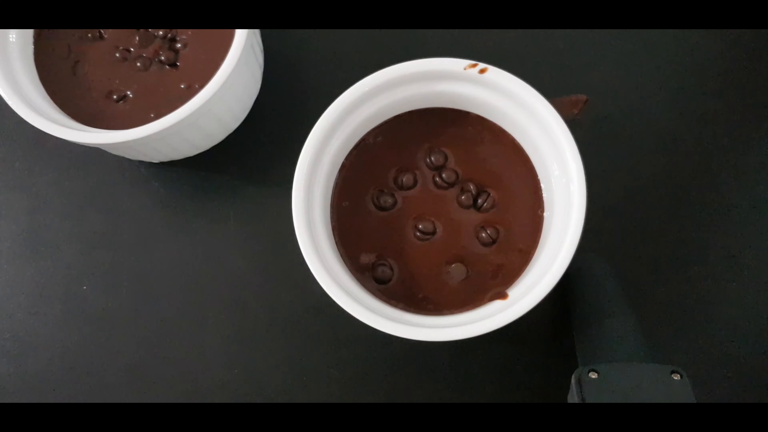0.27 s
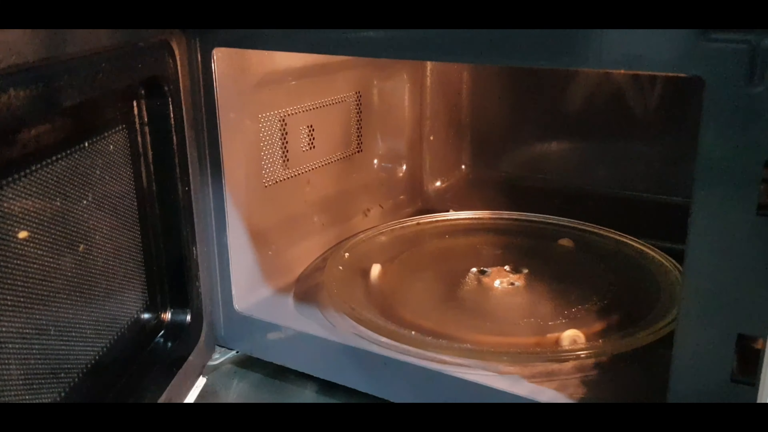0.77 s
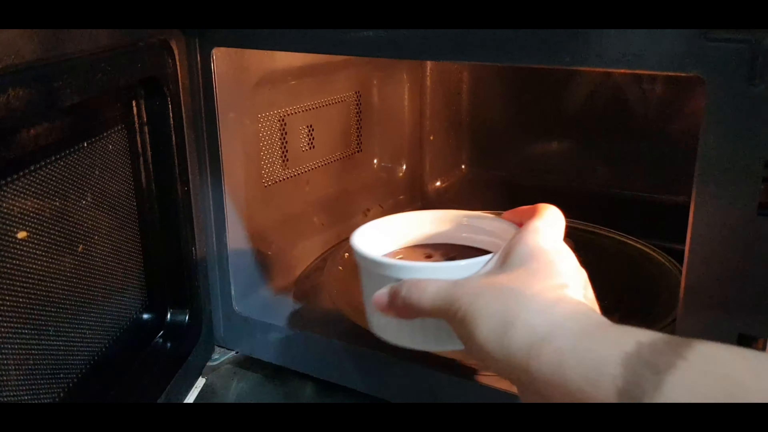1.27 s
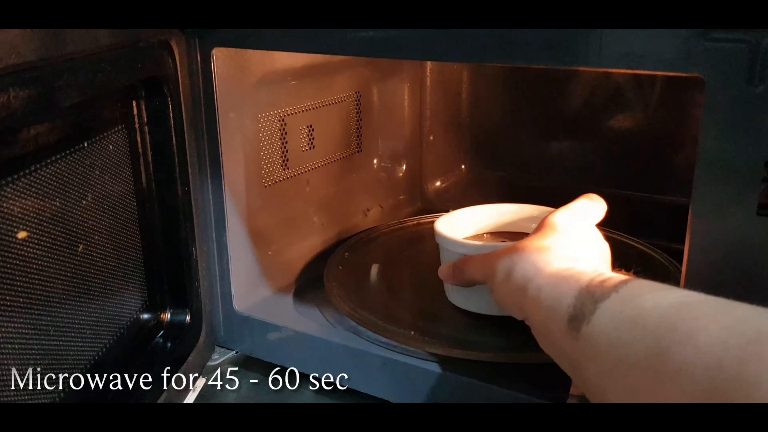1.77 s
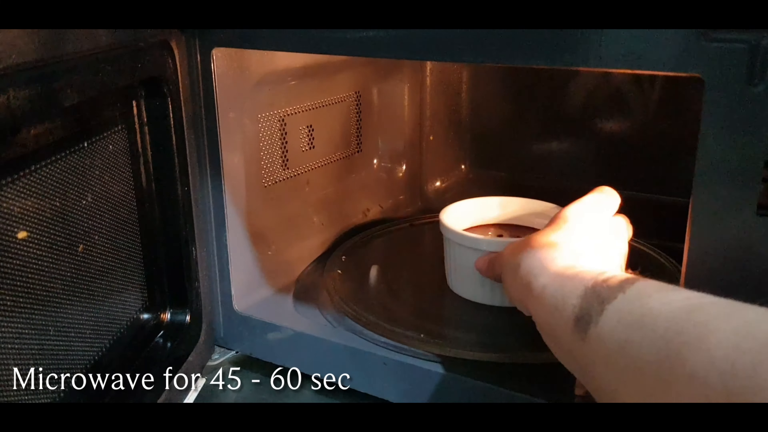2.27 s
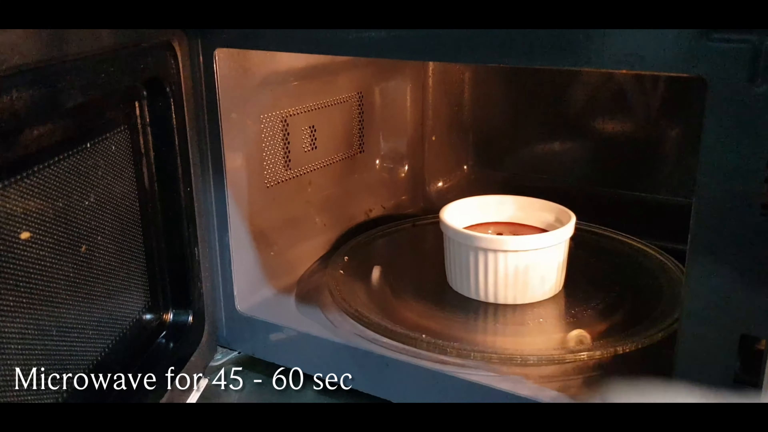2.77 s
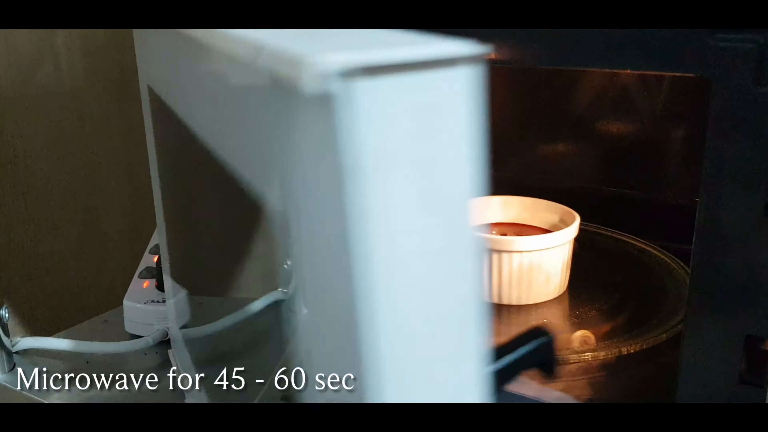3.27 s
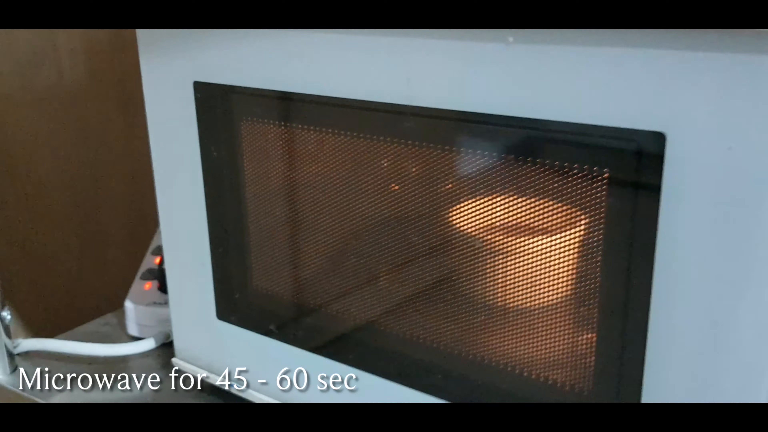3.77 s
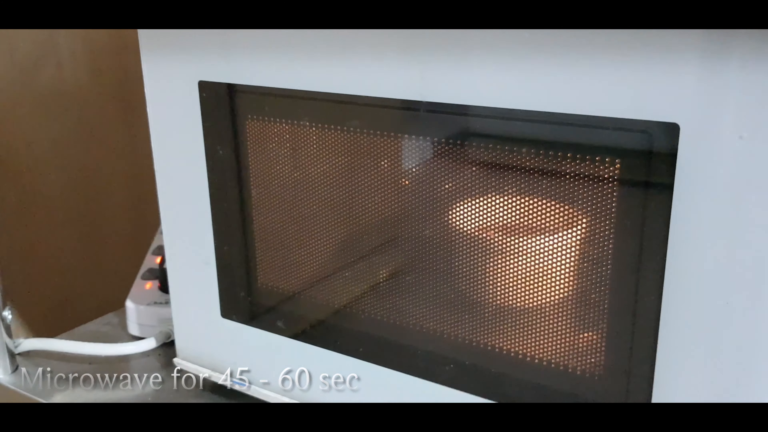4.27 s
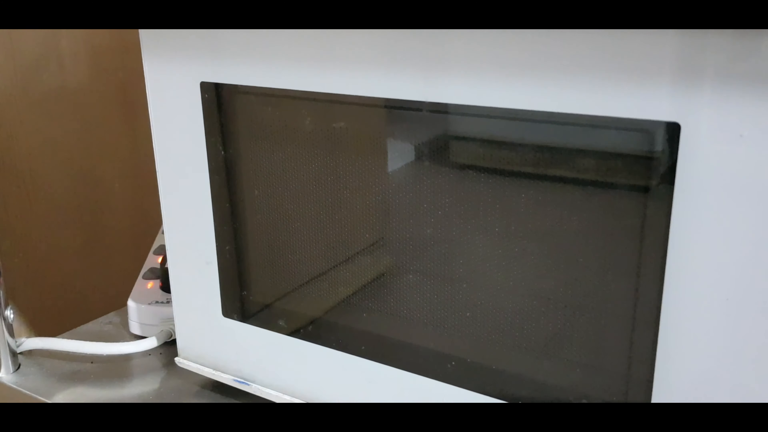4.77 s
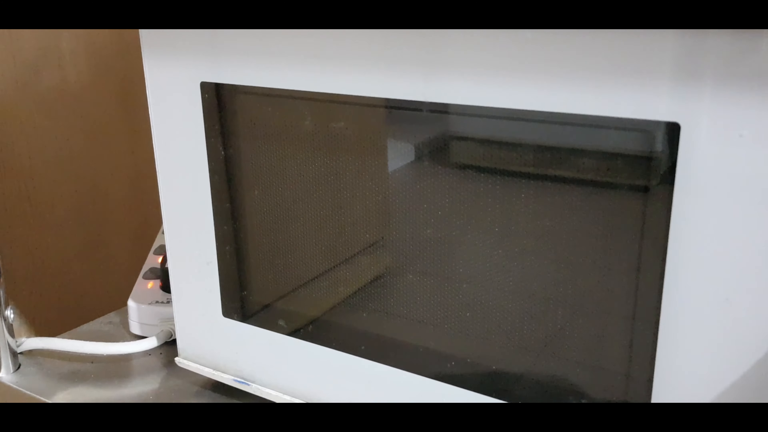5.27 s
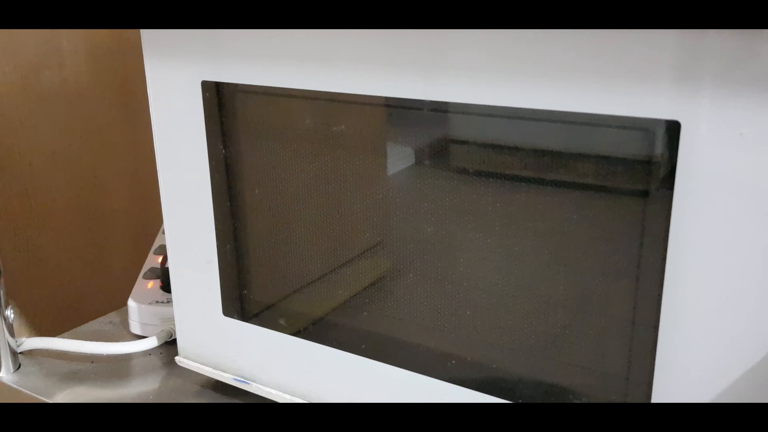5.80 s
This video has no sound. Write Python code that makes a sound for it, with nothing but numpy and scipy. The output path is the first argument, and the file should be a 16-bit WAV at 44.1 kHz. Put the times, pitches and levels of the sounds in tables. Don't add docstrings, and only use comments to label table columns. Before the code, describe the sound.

Quiet kitchen rumble and cloth movement lead to a sharp ceramic-on-glass clink as a dish is set inside a microwave oven. It wobbles, tips flat with a second knock and slides briefly with gritty scraping. The hinge squeaks faintly; a rattly latch knock comes first, then a much louder slam whose low thump and metallic rattle fade into the room. Heard close to the oven in stereo, with short hard-wall reflections.

```python
import sys
import numpy as np
from scipy import signal
from scipy.fft import rfft, irfft, next_fast_len
from scipy.io import wavfile
from scipy.ndimage import uniform_filter1d

SR = 44100
rng = np.random.default_rng(int(sys.argv[2]) if len(sys.argv) > 2 else 0)


def pcm_store(signal):
    levels = np.round(np.clip(np.atleast_2d(signal), -1, 1) * 32767)
    wavfile.write(sys.argv[1], SR, levels.astype(np.int16).T)


def invert_db(x):
    u = np.asarray(x, float) / 20
    return 10 ** u


N = 266231

PORT_LAG, FRONT_LAG = 16, 1

# t/s, level/dB
SET_DOWN_HITS = [
    (1.7415, 0),
    (1.743, -13.5),
    (1.753, -31),
    (1.805, -31),
    (1.868, -32),
]
# t/s, level/dB
TIP_FLAT_HITS = [
    (2.0345, -18),
    (2.0374, -13.5),
    (2.0401, -0.5),
    (2.055, -17),
    (2.1706, -30),
]


def rms_one(x):
    return x / np.sqrt(np.mean(x ** 2) + 1e-20)


def at_hz(points, hz):
    table_hz, values = np.transpose(points)
    return np.interp(np.log(hz + 1), np.log(table_hz), values)


def stereo_noise(spectrum, size=N, lag=PORT_LAG):
    # f/Hz, correlation
    likeness = [(60, 0.96), (290, 1), (640, 0.36), (1400, 0.229), (5000, 0.069), (15000, 0.053)]
    padded = 2 * next_fast_len(size // 2 + 1)
    hz = np.arange(padded // 2 + 1) * SR / padded
    mid, side = rfft(rng.standard_normal((2, padded)))
    alike = np.clip(at_hz(likeness, hz), 0, 1)
    left, right = np.sqrt(1 + alike) * mid + np.sqrt(1 - alike) * side * [[1], [-1]]
    right = right * np.exp(-2j * np.pi * hz * lag / SR)
    coloured = invert_db(at_hz(spectrum, hz)) * np.array([left, right])
    return rms_one(irfft(coloured, padded)[:, :size])


def flicker(rate):
    knots = rng.standard_normal(400)
    return np.interp(np.arange(N) / SR * rate, np.arange(400), knots)


def envelope(s, rise_s, hold_s, fall_s):
    corners = np.cumsum([0, rise_s, hold_s, fall_s])
    return np.interp(np.arange(N) / SR - s, corners, [0, 1, 1, 0])


def swells(rows):
    t = np.arange(N) / SR
    return sum(invert_db(level_db) ** 2 * np.exp(-((t - s) / spread) ** 2) for s, spread, level_db in rows)


def ring(drive, hz, t60):
    r, w = invert_db(-60 / (t60 * SR)), 2 * np.pi * hz / SR
    return signal.lfilter([0, np.sin(w)], [1, -2 * r * np.cos(w), r * r], drive + 1e-18)


def soft_blow(drive, hz, swell_s):
    return ring(drive, hz, swell_s) * 2 * np.log(1000) / (swell_s * SR)


def clicks(times, levels_db):
    out = np.zeros(N)
    out[np.round(np.asarray(times) * SR).astype(int)] = invert_db(levels_db)
    return out


def bursts(rows, colour, rise_s, grain_db=0.):
    t = np.arange(SR // 2) / SR
    first = round(min(rows)[0] * SR)
    size = min(N, round(max(rows)[0] * SR) + len(t)) - first
    loudness, out = np.zeros(N + len(t)), np.zeros((2, N))
    for s, level_db, t60, *_ in rows:
        loudness[round(s * SR):][:len(t)] += invert_db(level_db - 60 * t / t60) * np.minimum(t / rise_s, 1)
    knots = size // 128 + 2
    grain = np.interp(np.arange(size) / 128, np.arange(knots), rng.standard_normal(knots))
    noise = stereo_noise(colour, size=size, lag=FRONT_LAG)
    out[:, first:first + size] = loudness[first:first + size] * invert_db(grain_db * grain) * noise
    return out


def to_ports(x, pan_db, lag=FRONT_LAG):
    return np.array([x * invert_db(pan_db / 2), np.roll(x, lag) * invert_db(-pan_db / 2)])


def background():
    # f/Hz, level/dB per Hz
    rumble_colour = [(12, -43.5), (20, -22), (33, 1), (54, 3.5), (86, 3), (134, -8), (160, -11), (210, -30),
                     (350, -120)]
    tone_colour = [(94, -35.5), (160, -2.5), (270, -6.5), (345, -7), (451, -12), (581, -10.5), (730, -15.5),
                   (980, -12), (1200, -20), (1560, -38.5), (2640, -120)]
    upper_colour = [(710, -32.5), (1200, 1), (1850, -1), (2270, -5), (2450, -5.5), (3590, -12.5),
                    (4170, -11.5), (6650, -19), (15000, -31.5), (16000, -31.5)]
    cloth_colour = [(1470, -31), (2500, -7.5), (3280, -4), (3550, -3.5), (5920, -5.5), (9730, -7),
                    (11400, -5.5), (15200, -8.5), (16000, -11)]
    hiss_colour = [(1500, -30), (2000, -5), (2400, 1), (2900, -10), (3600, -25)]
    # t/s, level/dB
    kitchen = [(0, -0.5), (.63, 2.5), (.69, 0.5), (.71, -5.5), (.99, 1.5), (1.2, -2.5), (1.8, -2.5),
               (2.3, -7), (2.9, -5.5), (3.75, -7), (4.3, -5), (4.54, 3), (5.0, -0.5), (5.25, 5.5),
               (5.45, -5.5), (6.04, -8)]
    # t/s, spread/s, level/dB
    shifts = [
        (.55, 0.1, -48),
        (.95, 0.39, -45),
        (1.6, 0.16, -40.5),
        (3.05, 0.34, -45),
        (4.1, 0.14, -42.5),
        (4.45, 0.091, -44),
        (4.8, 0.092, -39),
    ]
    # t/s, spread/s, level/dB
    brushes = [
        (.1, .15, -83),
        (.42, .12, -81),
        (.64, .07, -68),
        (.97, 0.13, -54),
        (1.3, 0.17, -60),
        (1.65, 0.13, -68.5),
        (3.15, 0.24, -69),
        (3.275, 0.049, -58.5),
        (4.2, 0.17, -69),
        (4.54, 0.066, -68),
    ]
    kitchen_db = np.interp(np.arange(N) / SR, *np.transpose(kitchen))
    rumble = np.sqrt(invert_db(-46.5 + 0.71 * kitchen_db) ** 2 + swells(shifts))
    out = rumble * invert_db(2.536 * flicker(9.)) * stereo_noise(rumble_colour)
    out += invert_db(-46 + 0.8 * kitchen_db + 0.98 * flicker(15.0)) * stereo_noise(tone_colour)
    swing_db = 4 * envelope(3, 0.24, 1, 0.24)
    out += invert_db(-55.5 + kitchen_db + swing_db + .5 * flicker(12.0)) * stereo_noise(upper_colour)
    hiss = invert_db(-62) * envelope(-1, .5, 0.5 + .68, .02)[:SR]
    out[:, :SR] += hiss * stereo_noise(hiss_colour, size=SR)
    cloth = np.sqrt(invert_db(-78.5) ** 2 + swells(brushes))
    return out + cloth * invert_db(0.617 * flicker(22.0)) * stereo_noise(cloth_colour)


def ticks():
    # t/s, level/dB, t60/s
    taps = [(.3, -66, 0.06), (.4774, -44, .015), (.5063, -50, 0.022), (2.417, -53, .03), (2.9353, -57, .03),
            (4.69, -49.5, .02), (4.699, -53.5, 0.022), (4.7028, -30.5, 0.018), (4.7105, -42, 0.055),
            (4.7657, -45, 0.022), (5.1039, -50, 0.021), (5.63, -58, 0.034)]
    # f/Hz, level/dB per Hz
    colour = [(240, -22), (400, -2), (2050, -19.5), (3210, -15.5), (4050, -18), (5030, -16.5), (6850, -19),
              (11900, -21), (16000, -28.5)]
    return bursts(taps, colour, 0.0014)


def pings():
    # t/s, f/Hz, level/dB, t60/s
    notes_struck = [(.31, 8720, -59, 0.067), (1.868, 1840, -45, 0.13), (1.922, 970, -38, 0.055),
                    (1.959, 1015, -48, .06), (1.961, 1800, -51.5, 0.18), (1.983, 1060, -48, .06),
                    (2.004, 1000, -42, 0.062), (2.166, 1030, -46, 0.044), (2.177, 1080, -39.5, 0.05),
                    (2.187, 1130, -48, 0.035), (2.932, 6574, -63.5, .04), (2.935, 9150, -61, 0.038),
                    (3.511, 4520, -60, .05), (4.478, 1150, -18, .018), (4.4843, 1900, -16, 0.0077),
                    (4.4886, 1500, -19, .015), (4.493, 2530, -25.5, 0.018), (4.497, 2200, -19, 0.013),
                    (4.5, 1180, -34, 0.0095), (4.506, 2270, -27, .02), (4.5127, 2550, -26, 0.02),
                    (4.523, 2800, -35.5, 0.018), (4.531, 2300, -32, 0.022), (4.536, 2666, -45, .03),
                    (4.548, 2520, -32.5, .03), (4.563, 2520, -40.5, .03), (4.578, 2360, -42, .03),
                    (5.134, 5920, -25.5, 0.018), (4.489, 6140, -36, 0.046), (4.686, 8820, -58, .03),
                    (5.15, 12400, -43.5, 0.05)]
    out = np.zeros(N)
    for s, hz, level_db, t60 in notes_struck:
        start, touch = round(s * SR), np.zeros(8000)
        touch[0] = invert_db(level_db)
        out[start:start + len(touch)] += ring(soft_blow(touch, hz, .005), hz, t60)
    return to_ports(out, 0.)


def rocking_db():
    # t/s, length/s, depth/dB
    chokes = [
        (1.75, 0.011, 28),
        (1.806, 0.066, 16),
        (1.938, 0.023, 14),
    ]
    t = np.arange(N) / SR
    opening_db = 11.5 * (t - SET_DOWN_HITS[0][0])
    free_db = np.where(t < TIP_FLAT_HITS[0][0], opening_db, -5)
    for s, length, depth_db in chokes:
        grip_s = min(0.015, length)
        free_db = free_db - depth_db * envelope(s, grip_s, length - grip_s, 0.0084)
    return uniform_filter1d(free_db, size=200)


def dish():
    # f/Hz, t60/s, set-down/dB, tip-flat/dB, slide/dB, left over right/dB
    plate_and_dish_modes = [(266.5, 0.24, -34, -33.5, -9, 1), (503, 0.56, -44.5, -38.5, -12, -1),
                            (518.5, .45, -40.5, -39.5, -9, 1), (605, 0.14, -34.5, -28, -7, 8),
                            (623.6, .22, -42, -36, -4, 2), (758, 0.097, -27.5, -34, -12, 18.5),
                            (816, 0.18, -22.5, -40, -5, -5.5), (837, .24, -32, -39, -13, -2),
                            (901, .24, -33.5, -48, -18, 2), (938, 0.39, -31, -43, -17, -2.5),
                            (1031, 0.033, -15, -18, 5, 15.5), (1080, 0.073, -22.5, -40, 0, 6),
                            (1141, 0.09, -38, -36, -9, -3), (1245, 0.06, -34.5, -26, -5, 2),
                            (1290, 0.22, -41, -34.5, -18, 0), (1450, 0.0496, -26, -47, -15, -2),
                            (1390, 0.13, -26.5, -40, -10, 10.5), (1710, 0.23, -21, -38, -9, -14.5),
                            (1748, 0.26, -9.5, -39, -7, -5), (1760, 0.63, -35, -55, -24, -1),
                            (1797, 0.05, -10.5, -30, -4, -11), (1840, .085, -31, -32.5, -1.5, -0.5),
                            (1950, 0.078, -20.5, -44, -13, -1), (2137, 0.17, -40, -36, -16, -9),
                            (2356, 0.036, -19.5, -43, -27, 12), (2640, 0.029, -34, -56, -29, 0),
                            (2990, .15, -30, -48, -24, -3), (2986, 0.26, -21, -49, -22, -6),
                  (3040, 0.6, -46, -65, -32, -1), (3100, 0.21, -40, -55, -13, -2),
                  (3200, 0.083, -29, -52, -24, 7), (3213, 0.17, -23.5, -48, -19, 10),
                  (3240, 0.23, -34.5, -50, -30, 4), (3330, 0.029, -33, -33, -18, -2.5),
                  (3280, 0.294, -50, -52, -22, 0), (3340, 0.14, -46, -52, -12, 2.5),
                  (4030, 0.0521, -37, -54, -20, 4.5), (4510, 0.33, -48, -51.5, -20.5, -1.5),
                  (4954, 0.13, -28.5, -58, -32, -4), (5010, 0.25, -41, -75, -46, 0),
                  (6140, 0.109, -56.5, -58, -24.5, 1), (6990, 0.13, -44, -54, -25, 1.5),
                  (7360, .08, -57.5, -50.5, -26, 7.5), (8760, .12, -69, -71, -47, -6.5),
                  (9690, .1, -59.5, -65, -26, 9), (11440, 0.112, -55.5, -60, -34, 0.5),
                  (12480, .09, -52, -50, -33, 9), (12580, .06, -56, -44.5, -29, 10)]
    # t/s, level/dB
    catches = [(2.3865, -26.5), (2.4165, -18.5), (2.421, -17.5), (2.444, -22.5), (2.473, -20), (2.495, -14),
               (2.515, -16.5), (2.531, -15.5), (2.547, -16), (2.57, -25), (2.6, -35), (2.612, -29),
               (2.6333, -19), (2.66, -29)]
    # t/s, level/dB, t60/s
    clatter = [
        (1.7415, -31, 0.05),
        (1.75, -28, 0.35),
        (2.035, -26.5, 0.056),
        (2.039, -29.5, 0.037),
        (2.05, -34, 0.29),
        (2.172, -48.5, 0.063),
    ]
    # t/s, level/dB, t60/s
    chatter = [
        (1.756, -55.5, 0.23),
        (2.076, -59, 0.16),
        (2.418, -72, .5),
        (2.5, -74, 0.37),
    ]
    # f/Hz, level/dB per Hz
    clatter_colour = [(120, -43.5), (200, -12.5), (281, -14.5), (437, -22.5), (598, -1), (1790, -11),
                      (2590, -23), (4580, -27), (5130, -37), (5430, -66), (6000, -36), (7800, -61),
                      (13200, -120)]
    chatter_colour = [(6000, -40), (8200, -12), (9500, -2), (10800, -9), (12400, 3), (13200, -30)]
    scrape_colour = [(180, -36), (300, -3), (459, -3), (497, -1), (1060, -1), (1520, -16), (1810, -11),
                     (2520, -46), (3100, -16), (4050, -37), (13000, -53)]

    span = slice(round(1.7 * SR), round(3.1 * SR))
    set_down = clicks(*np.transpose(SET_DOWN_HITS))[span]
    tip_flat = clicks(*np.transpose(TIP_FLAT_HITS))[span]
    stroke = invert_db(-46) * envelope(2.395, 0.1, 0.067, 0.15)
    struck = rng.random(N) < 2500 / SR
    grit = struck * invert_db(2.5 * rng.exponential(1, N)) * rng.choice([-1, 1], N)
    slide = (invert_db(-30.0) * stroke * grit)[span]
    catch_s, catch_db = np.transpose(catches)
    uneven_db = 3. * rng.standard_normal((len(catches), 60))
    apart = rng.uniform(-1, 1, 60)
    rocking = invert_db(rocking_db()[span])
    wobble = invert_db(2.5 * flicker(60.))

    out = invert_db(-2.0 + 2.1 * flicker(60.)) * stroke * stereo_noise(scrape_colour, lag=FRONT_LAG)
    for k, (hz, t60, set_db, tip_db, slide_db, pan_db) in enumerate(plate_and_dish_modes):
        caught = clicks(catch_s, catch_db - 34.5 + uneven_db[:, k])[span]
        drive = invert_db(set_db) * set_down + invert_db(tip_db) * tip_flat + invert_db(slide_db) * (slide + caught)
        drive = soft_blow(drive, hz, .0036)
        mode = (-1) ** k * ring(drive, hz, t60)
        if hz > 5500:
            mode += 0.64 * ring(drive, hz * 1.011, t60 * .7)
            mode -= 0.47 * ring(drive, hz * 0.53, t60 * 0.49)
        if 1700 < hz < 1795:
            mode *= rocking
        lag_cycles = .16 * apart[k] - .1
        lag = round(lag_cycles * min(SR / hz, 25))
        out[:, span] += to_ports(mode * np.roll(wobble, 7919 * k)[span], pan_db, lag)
    out += bursts(clatter, clatter_colour, 0.0022)
    return out + bursts(chatter, chatter_colour, .006)


def hinge():
    # t/s, length/s, f/Hz, level/dB
    squeaks = [
        (3.343, 0.11, 3760, -66),
        (3.47, 0.07, 3765, -67.5),
    ]
    waver_hz, grip_db, out = 15 * flicker(60.), 2.5 * flicker(55.), 0
    for s, length, hz, level_db in squeaks:
        swell = envelope(s, 0.18 * length, 0.63 * length, 0.3 * length)
        whistle = np.sin(2 * np.pi * np.cumsum(hz + waver_hz) / SR)
        out = out + invert_db(level_db + grip_db) * swell * whistle
    return to_ports(out, 0.)


def door():
    # t/s, rattle/dB, rattle t60/s, thump/dB
    knock_hits = [
        (4.474, -29.5, 0.044, -57),
        (4.477, -23, 0.03, -30.5),
        (4.4846, -19.5, 0.053, -27),
        (4.494, -22, 0.033, -32),
        (4.501, -28.5, 0.26, -36),
    ]
    # t/s, rattle/dB, rattle t60/s, thump/dB
    slam_hits = [
        (5.119, -37.5, 0.065, -50),
        (5.1245, -16.5, 0.02, -13),
        (5.127, -11, 0.045, -16),
        (5.133, -18, 0.068, -15),
        (5.14, -19.5, 0.16, -21.5),
        (5.156, -32, 0.45, -29.5),
        (5.251, -42, 0.056, -63),
    ]
    # t/s, level/dB, t60/s
    latch = [
        (4.477, -32.5, 0.039),
        (5.1265, -19, 0.04),
        (5.131, -21.5, 0.044),
        (5.255, -49, .04),
    ]
    # f/Hz, level/dB per Hz
    knock_colour = [(180, -17.5), (300, -1.5), (420, -9), (634, -12.5), (1080, -9.5), (1400, -9.5),
                    (1750, -6.5), (2200, -9), (2700, -10), (3100, -14), (4670, -23.5), (6200, -25),
                    (12500, -36.5), (16000, -41)]
    slam_colour = [(210, -32.5), (350, -4), (520, -7), (742, -12), (1060, -6), (1280, -16), (1430, -9.5),
                   (2840, -16.5), (3080, -17), (3340, -15.5), (12200, -31), (16000, -24.5)]
    latch_colour = [(1760, -42), (3000, -17), (3260, -7.5), (3730, -11), (5960, -0.5), (7780, -13.5),
                    (12300, -5.5), (16000, -24)]
    # f/Hz, t60/s, knock/dB, slam/dB
    casing = [(475, 0.9, -25, -31), (542, 0.71, -28.5, -26.5), (580, 0.43, -25, -27.5),
              (630, .25, -27, -23), (682, 0.19, -8, -23.5), (893, 0.36, -6, -15.5), (1036, .3, -31, -24.5),
              (1070, 0.2, -13.5, -41), (1444, .2, -25, -25.5)]
    # f/Hz, t60/s, level/dB
    panel = [(79, 0.35, -8), (105.4, 0.45, -13), (144, 0.18, -14), (164, 0.3, -13.5), (207.3, 1, -3),
             (221.5, 0.33, -1), (225, 0.11, 2.5), (276, 0.23, -20), (321.4, 0.19, -11.5),
             (359, 0.65, -16.5), (404, 0.4, -17.5)]
    first, thump = round(4.4 * SR), np.zeros(N)
    knock_s, _, _, knock_thump_db = np.transpose(knock_hits)
    slam_s, _, _, slam_thump_db = np.transpose(slam_hits)
    knock = clicks(knock_s, knock_thump_db)[first:]
    slam = clicks(slam_s, slam_thump_db)[first:]
    wobble = invert_db(4 * flicker(14.))
    for k, (hz, t60, knock_db, slam_db) in enumerate(casing):
        mode = (-1) ** k * ring(invert_db(knock_db) * knock + invert_db(slam_db) * slam, hz, t60)
        thump[first:] += mode * np.roll(wobble, 9973 * k)[first:]
    for k, (hz, t60, level_db) in enumerate(panel):
        thump[first:] += (-1) ** k * ring(invert_db(level_db) * knock, hz, t60)
    rattle = bursts(knock_hits, knock_colour, 0.0011, grain_db=3.0)
    rattle += bursts(slam_hits, slam_colour, 0.0017, grain_db=0.5)
    rattle += bursts(latch, latch_colour, 0.00086)
    return to_ports(thump, .5) + rattle


def boom():
    # f/Hz, t60/s, level/dB, first swing (out +, in -, about 1)
    walls = [(90.2, 1.37, -35.5, 1), (105.4, 0.53, -23.5, -1), (118, 0.097, -9, -1.07),
             (134, 0.35, -16.5, 1), (137, 3.4, -46.5, 1), (141, 4., -54, -0.968), (144, 0.45, -26.5, -1.2),
             (192.6, 1.64, -34.5, 1), (197.8, 0.88, -24, 0.93), (199.2, 0.29, -14.5, -0.92),
             (226, 0.12, -26, -1), (263, 0.71, -30, 1), (281.4, 0.19, -9.5, 0.89), (297, .45, -18.5, -1.15),
             (297.5, 4.8, -44, 1), (313.2, 0.43, -19.5, 0.96), (353, 0.24, -26, 1), (390, 0.11, -16, 0.77),
             (424, 0.14, -18.5, 0.82)]
    first, out = round(5.1247 * SR), np.zeros(N)
    blow = np.zeros(N - first)
    blow[:64] = np.hanning(64) / 32
    out[first:] = sum(way * invert_db(level_db) * ring(blow, hz, t60) for hz, t60, level_db, way in walls)
    return to_ports(out, 0.407)


def room(x):
    # f/Hz, t60/s
    room_t60 = [(100, 0.78), (400, 0.68), (1500, 0.43), (5000, 0.37), (15000, 0.32)]
    size = 32768
    noise = stereo_noise([(20, 0), (20000, 0)], size=size)
    t, tail = np.arange(size) / SR, 0
    for low_hz in 60 * 2. ** np.arange(8):
        octave = signal.butter(2, [low_hz, 2 * low_hz], "band", fs=SR, output="sos")
        t60 = at_hz(room_t60, low_hz * np.sqrt(2))
        tail = tail + signal.sosfilt(octave, noise) * invert_db(-60 * t / t60)
    tail = tail * np.minimum(t / 0.0022, 1) / np.sqrt(SR / 20)
    return signal.fftconvolve(x.mean(axis=0)[None], tail, axes=1)[:, :N]


def scene():
    air = background()
    small = ticks() + pings() + hinge()
    plate, shut, low = dish(), door(), boom()
    wet = invert_db(-10) * plate + shut + invert_db(4.0) * small + invert_db(-11.5) * low
    return plate + shut + low + small + room(wet) + air


def band_limit(x):
    return signal.sosfilt(signal.butter(12, 16520, fs=SR, output="sos"), x)


def record(dry):
    x = signal.sosfilt(signal.butter(4, 32, "high", fs=SR, output="sos"), dry)
    x = x / (1 + np.abs(x / .95) ** 6) ** (1 / 6)
    x = signal.sosfilt(signal.cheby2(10, 50, 16350, fs=SR, output="sos"), x)
    return band_limit(x)


dry = scene()
out = record(dry)
pcm_store(out)
```